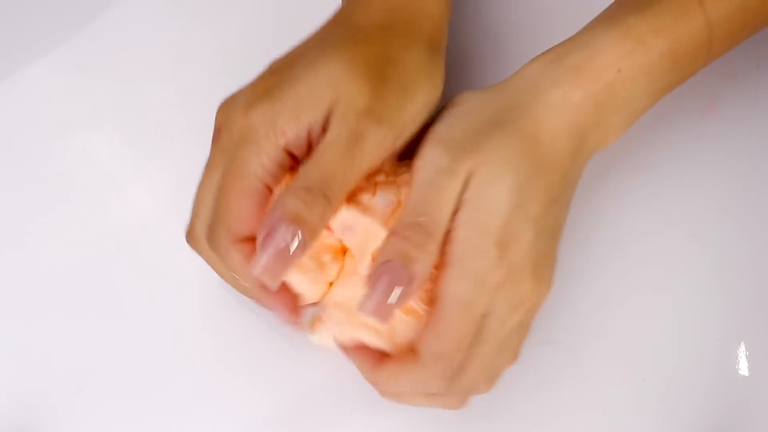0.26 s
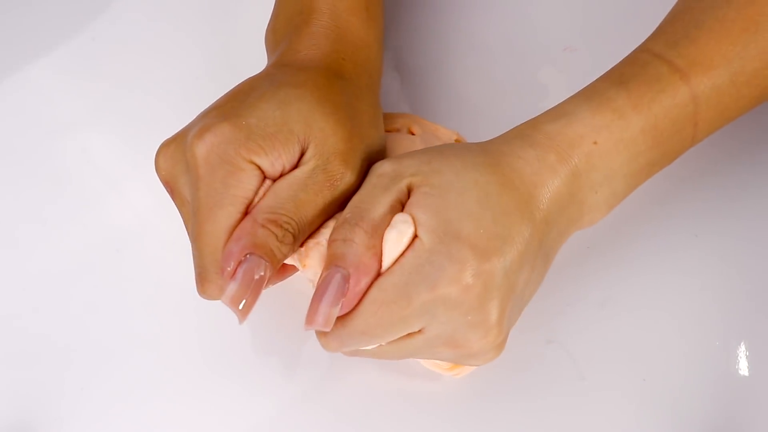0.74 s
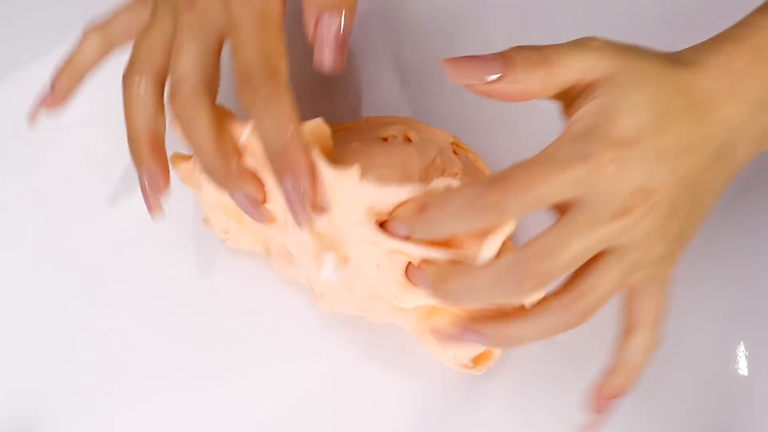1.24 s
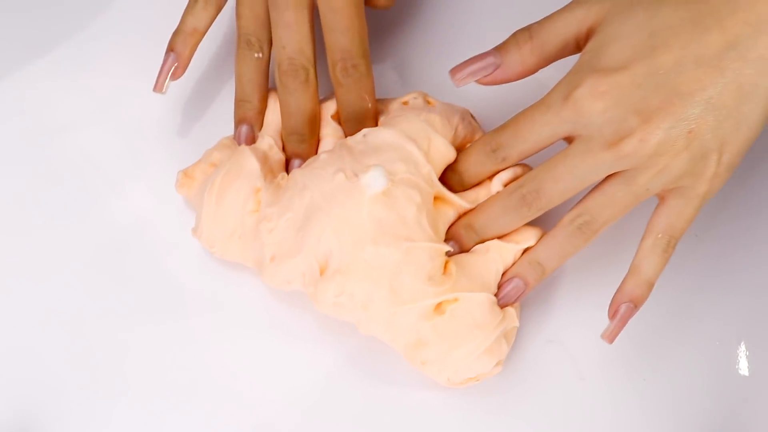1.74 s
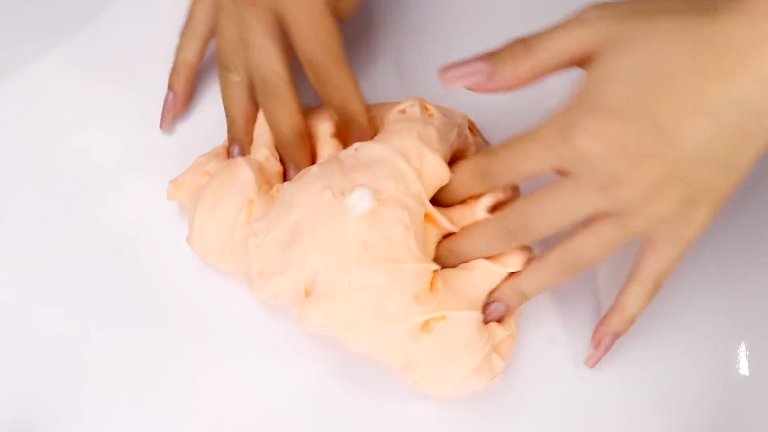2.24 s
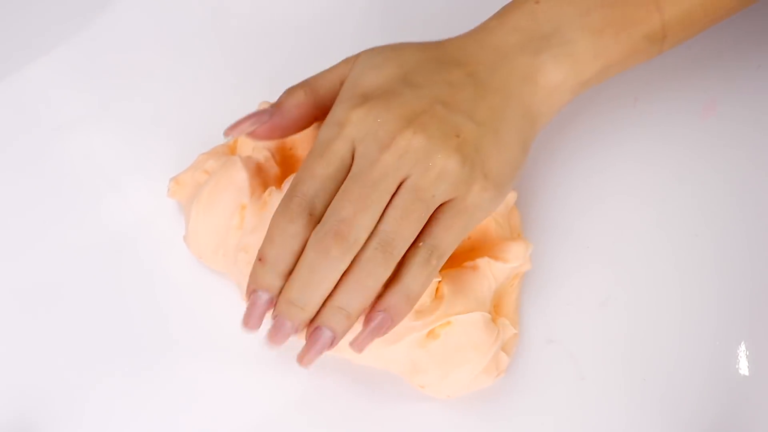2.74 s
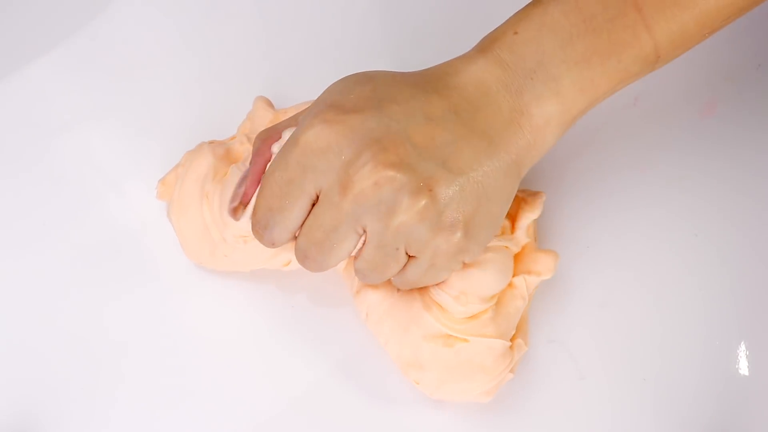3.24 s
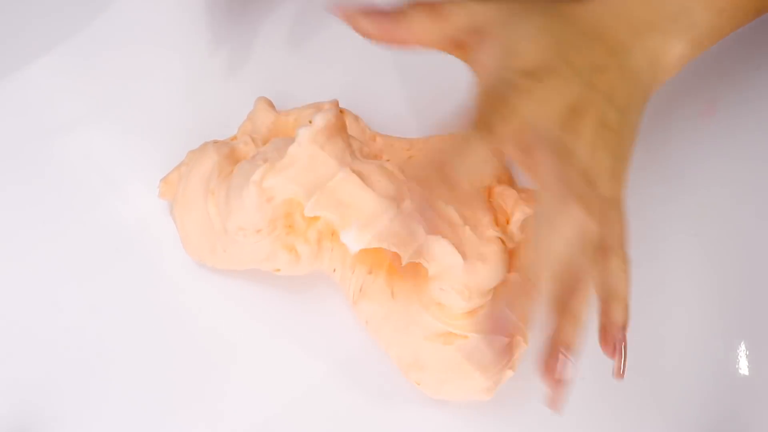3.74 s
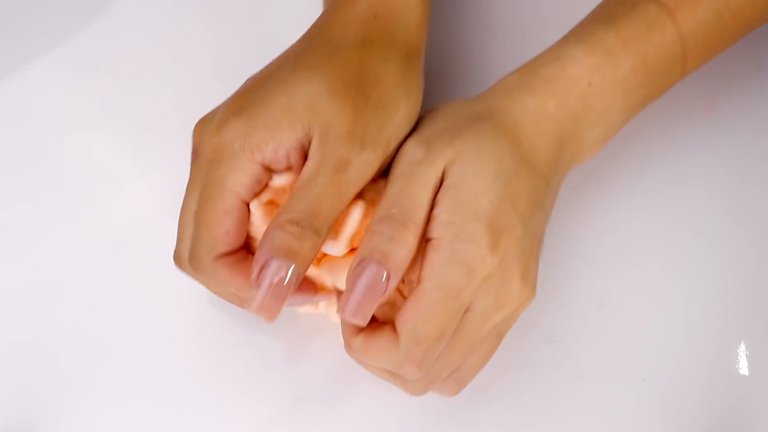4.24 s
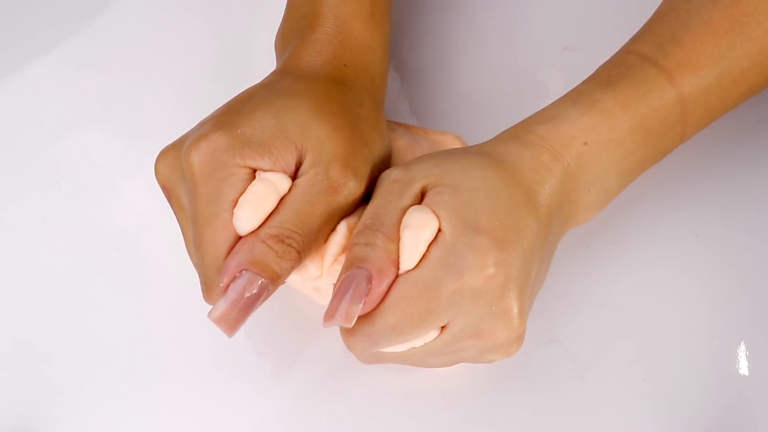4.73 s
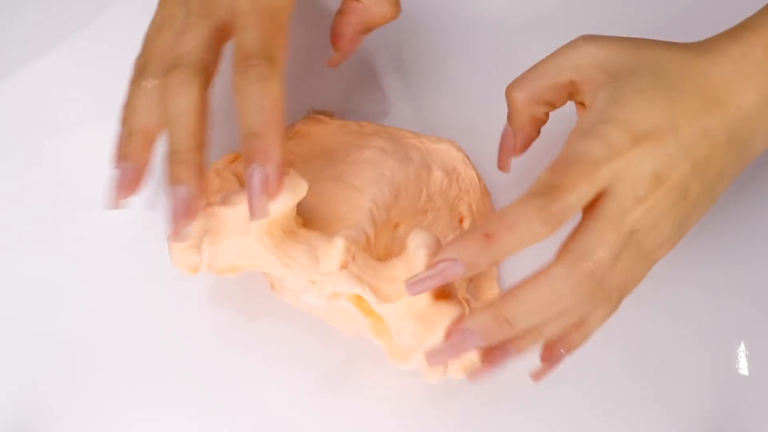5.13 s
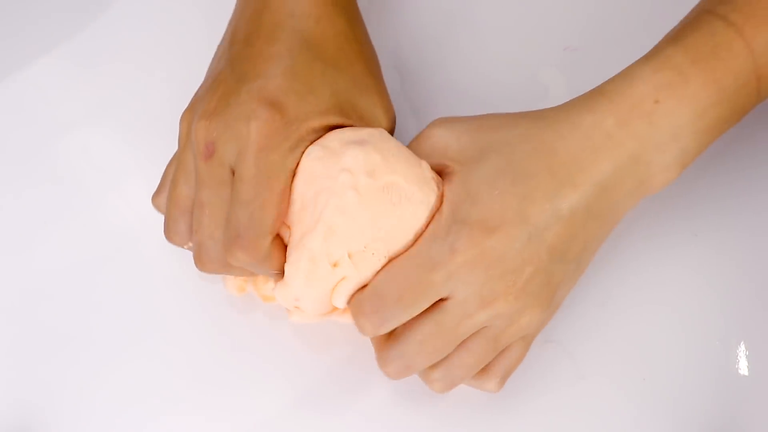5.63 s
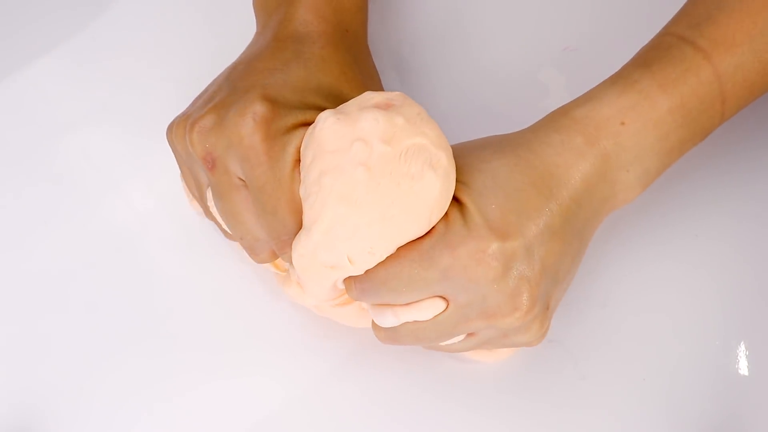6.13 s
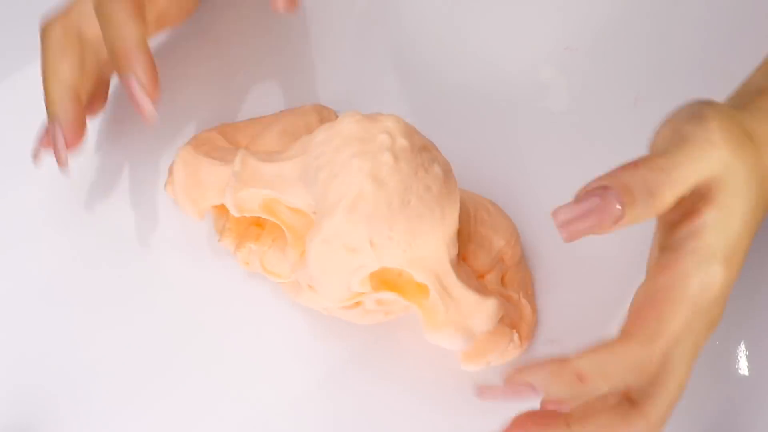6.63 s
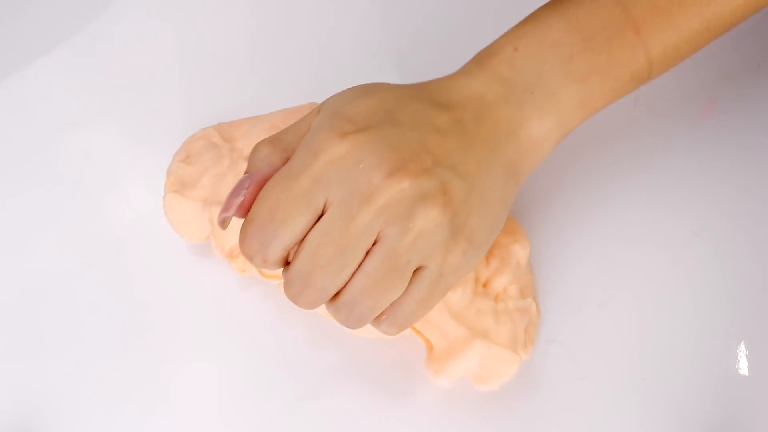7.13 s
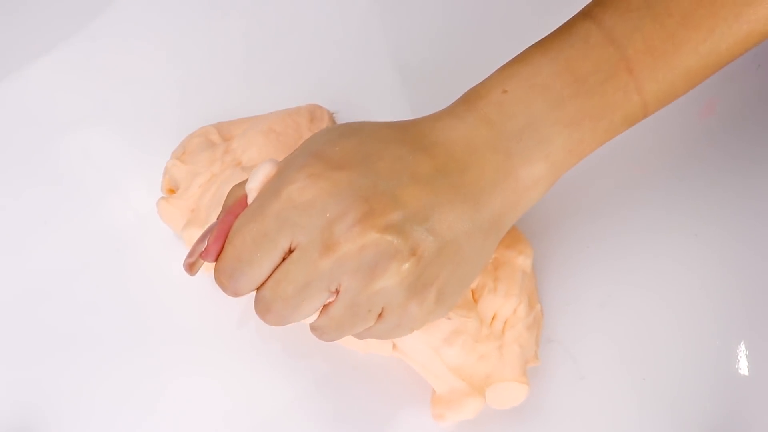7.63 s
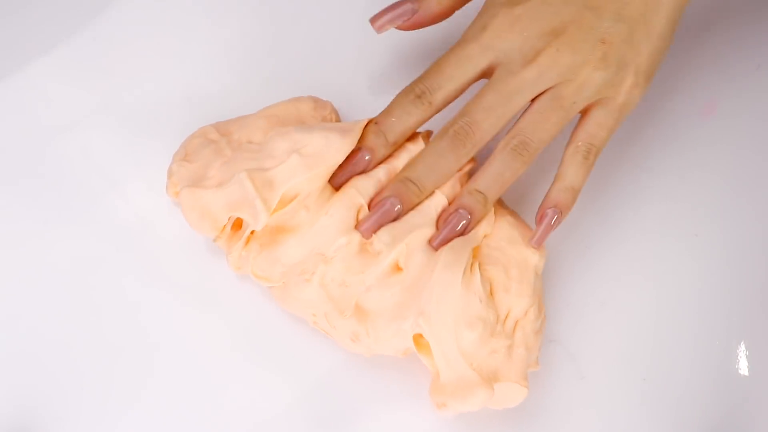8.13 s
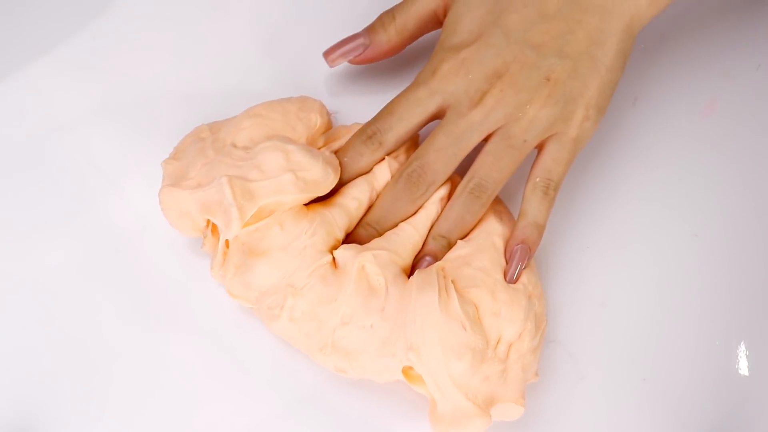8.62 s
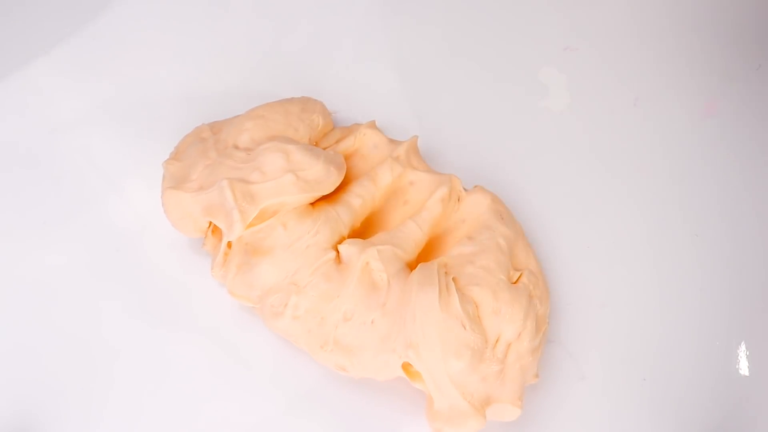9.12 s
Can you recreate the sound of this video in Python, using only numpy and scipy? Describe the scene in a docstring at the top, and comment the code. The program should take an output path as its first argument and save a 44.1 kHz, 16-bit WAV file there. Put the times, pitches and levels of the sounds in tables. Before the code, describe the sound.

Two hands squeeze and knead sticky slime on a table, very close to the microphone. Scattered sharp clicks and fine crackle accompany soft squelches, with a loud snap early on and another strong pop around three seconds. Between squeezes, fingers peel off in short dense wet smacks, with low gulps. The small room is quiet, with faint low rumble and hiss and a very short echo.

```python
"""In a small quiet room, two hands knead soft, sticky slime on a table, close to the microphone.
Squeezing bursts trapped air bubbles: random tiny clicks make fine crackle and squelch, and single
pressure pulses with a short spit of noise make pops, clicks and one loud snap. Between squeezes the
fingers peel away with a dense wet smack, and hollows gulp as short tones of rising pitch.
Room tone, table and room echo are filtered noise, ringing modes and dying noise tails."""
import sys
import numpy as np
from scipy import signal
from scipy.fft import rfft, irfft, next_fast_len
from scipy.io import wavfile
from scipy.ndimage import uniform_filter1d

SR = 44100
rng = np.random.default_rng(int(sys.argv[2]) if len(sys.argv) > 2 else 0)


def write(x):
    x = np.atleast_2d(x).T
    wavfile.write(sys.argv[1], SR, np.round(np.clip(x, -1, 1) * 32767).astype(np.int16))


N = 413215
TIME = np.arange(N) / SR   # [s]


def from_db(db):
    """Turn decibels into a gain."""
    return 10 ** (np.asarray(db) / 20)


def rms_one(x):
    """Scale a sound to unit power."""
    return x / np.sqrt(np.mean(x ** 2) + 1e-20)


def at_hz(points, hz, axis=1):
    """Read one column of a table at any pitch, on a log-frequency axis."""
    points = np.array(points)
    return np.interp(np.log(np.maximum(hz, 1)), np.log(points[:, 0]), points[:, axis])


def band(x, hz, octaves):
    """Keep only the pitches around a centre; the filter never looks ahead in time."""
    top = min(hz * 2 ** (octaves / 2), .44 * SR)
    bottom = min(hz / 2 ** (octaves / 2), top * .9)
    band_pass = signal.butter(2, [bottom, top], "band", fs=SR, output="sos")
    return signal.sosfilt(band_pass, x + 1e-18)


def add(out, s, sound):
    """Mix a short sound in at time s."""
    at = int(round(s * SR))
    out[at:at + len(sound)] += sound[:N - at]


def drift(rate):
    """Wander by chance in straight lines between random points, rate points a second; unit power."""
    knots = rng.standard_normal(int(N / SR * rate) + 2)
    return rms_one(np.interp(TIME * rate, np.arange(len(knots)), knots))


# colour of the room tone; only the shape counts: (frequency [Hz], relative level [dB per Hz])
ROOM_TONE_COLOUR = [(12, -6), (25, -11.5), (45, -11.5), (68, -21), (100, -24), (200, -28.5), (330, -36),
                    (750, -36.5), (1500, -35), (2300, -35), (3100, -38), (5500, -48), (10000, -49),
                    (16000, -56)]
ROOM_TONE_DB = -59.5   # overall level


def room_tone():
    """Steady low rumble and faint hiss: random noise, coloured by the table."""
    size = next_fast_len(N)
    hz = np.arange(size // 2 + 1) * SR / size
    colour = from_db(at_hz(ROOM_TONE_COLOUR, hz))
    noise = irfft(rfft(rng.standard_normal(size)) * colour, size)[:N]
    return from_db(ROOM_TONE_DB) * rms_one(noise)


# thin films at the surface break with a broad click; pops() trims both levels:
# (time [s], pulse peak level [dB], pulse centre [Hz], air spit level [dB])
SURFACE_CLICKS = [(0.1359, -13.5, 4020, -34.5), (0.151, -10, 2630, -48.5), (0.2379, -13, 2630, -36),
                  (0.2681, -8, 2520, -49), (0.3038, -14, 3210, -52), (0.4067, -18.5, 1310, -51),
                  (0.4764, -31, 2890, -40), (0.546, -41, 4000, -45.5), (0.6605, -12, 1820, -31),
                  (0.7018, -8.5, 1370, -23.5), (0.7538, -19.5, 1940, -42), (1.095, -10, 860, -62),
                  (1.244, -30, 2350, -34.5), (1.402, -24, 1880, -62), (1.5487, -24, 2080, -48),
                  (1.5651, -22, 2630, -54), (1.7295, -33, 3660, -50), (2.274, -21, 2343, -36),
                  (2.2975, -14, 1290, -53), (2.343, -5, 2820, -45), (2.9316, -26, 1900, -42),
                  (2.983, -21.5, 2120, -34), (3.552, -14, 605, -34.5), (3.585, -14.5, 567, -45),
                  (3.9002, -24, 1556, -50), (3.9214, -12, 7300, -47), (4.367, -12.5, 7000, -53),
                  (4.441, -21, 10100, -45), (4.4993, -23.5, 3520, -40), (4.5392, -17.5, 7600, -57),
                  (4.643, -44, 4850, -45.5), (4.8836, -15.5, 1160, -36), (4.9088, -12.5, 1140, -35),
                  (4.9447, -13, 2100, -34.5), (5.303, -19, 1130, -45.5), (5.4059, -25.5, 2610, -50),
                  (5.4447, -18, 9000, -53), (5.4648, -16, 1390, -48.5), (5.6364, -12, 3160, -32.5),
                  (5.693, -16.5, 1700, -36), (5.8263, -25, 1920, -45), (6.089, -28, 3900, -57),
                  (6.3443, -5.5, 1540, -44), (6.53, -10, 2890, -41.5), (7.1436, -13, 1950, -35.5),
                  (7.336, -41, 7000, -57.5), (7.472, -36, 6900, -55), (7.781, -12, 503, -34.5),
                  (8.1287, -22.5, 5000, -43.5), (8.2502, -27, 2930, -46), (8.2973, -16.5, 1440, -59),
                  (8.944, -7.5, 1700, -27), (8.988, -13.5, 2000, -45)]
CLICK_OCTAVES, CLICK_SPIT_HZ, CLICK_SPIT_S = 3.51, 8060, 0.0014   # pulse width; spit centre and rise time
# deep air pockets burst with a round pop; pops() trims both levels:
# (time [s], pulse peak level [dB], pulse centre [Hz], pulse width [octaves],
#  air spit level [dB], air spit centre [Hz], air spit rise time [s])
DEEP_POPS = [(0.8658, -7.5, 7200, 1.1, -13.5, 7100, 0.0012), (0.8666, -0.5, 744, 2.6, -15.5, 11000, 0.0023),
             (2.7444, -12, 1710, 1.03, -39, 9500, 0.00097), (3.082, 0, 1680, 4.1, -19, 6400, 0.00065),
             (3.2093, -4.5, 1070, 1.34, -12.5, 8800, 0.00022),
             (4.7354, -13, 940, 1.2, -44.5, 4760, 0.00053), (5.86, -4.5, 1060, 2.4, -18.5, 9300, 0.0009)]


def peaked_pulse(hz, octaves, size):
    """One sudden push of pressure around a centre pitch, with a peak of one."""
    pulse = band(signal.unit_impulse(size), hz, octaves)
    return pulse / np.abs(pulse).max()


def pops(spit_octaves=0.57, rasp_db=-3.0, rasp_hz=3500, rasp_octaves=9.5, pulse_db=-4.5, air_db=0.5,
         neighbour_db=-16.5, neighbour_s=0.0058, neighbour_octaves=1.8, scatter_octaves=1.43, count=5, size=2048):
    """A bubble's wall gives way in one pressure pulse, then air spits through the tear; gives pulses and spits."""
    bubbles = list(DEEP_POPS)
    for s, peak_db, hz, spit_db in SURFACE_CLICKS:
        bubbles.append((s, peak_db, hz, CLICK_OCTAVES, spit_db, CLICK_SPIT_HZ, CLICK_SPIT_S))
    pulses, spits, t = np.zeros(N), np.zeros(N), TIME[:size]
    for s, peak_db, hz, octaves, spit_db, spit_hz, spit_s in bubbles:
        add(pulses, s, from_db(peak_db + pulse_db) * peaked_pulse(hz, octaves, size))

        # neighbours of other sizes give way around it, the farther in time the weaker
        offsets = rng.uniform(-.6, 2.2, count)
        ratios = 2 ** (scatter_octaves * rng.uniform(-1.45, 1, count))
        for offset, ratio in zip(offsets, ratios):
            small = peaked_pulse(hz * ratio, neighbour_octaves, size)
            gain = from_db(peak_db + neighbour_db) * np.exp(-abs(offset))
            add(pulses, s + offset * neighbour_s, gain * small)

        air = rng.standard_normal(size)
        outflow = t / spit_s * np.exp(1 - t / spit_s)   # strongest after spit_s
        hiss = rms_one(band(air, spit_hz, spit_octaves))
        rasp = rms_one(band(air[::-1], rasp_hz, rasp_octaves))
        add(spits, s, from_db(spit_db + air_db) * outflow * (hiss + from_db(rasp_db) * rasp))
    return pulses, spits


# lowest modes of the table top under the slime: (frequency [Hz], gain [dB], time to fall by 60 dB [s])
TABLE_MODES = [(40, 7, 0.18), (100, 3, .16), (226.4, 1, 0.24), (298, -2.5, 0.21)]


def table_top(force):
    """The table top booms briefly in its lowest modes when pushed."""
    out = 0
    for hz, level_db, t60 in TABLE_MODES:
        r = from_db(-60 / (t60 * SR))   # what is left after each sample
        push = (1 - r * r) / 2 * np.array([1, 0, -1])
        ring = [1, -2 * r * np.cos(2 * np.pi * hz / SR), r * r]
        out = out + from_db(level_db) * signal.lfilter(push, ring, force)
    return out


def even_tail(decay, smooth_hz=45, count=3):
    """Dying noise whose spectrum is evened out, so that no single pitch rings on."""
    tail = rng.standard_normal(len(decay))
    width = max(int(smooth_hz * len(decay) / SR), 2)
    for _ in range(count):
        spectrum = rfft(tail * decay)
        power = uniform_filter1d(np.abs(spectrum) ** 2, width)
        tail = irfft(spectrum / np.sqrt(power), len(decay))
        loudness = np.sqrt(np.abs(uniform_filter1d(tail ** 2, size=300)) + 1e-20)
        tail = rms_one(tail / loudness)
    return tail * decay / np.linalg.norm(decay)


# room echo: (frequency [Hz], tail level before band filtering [dB], time to fall by 60 dB [s])
ROOM_ECHO = [(80, -15, 0.27), (250, -8.5, 0.12), (502.3, -13.5, 0.33), (1200, -10.5, 0.21),
             (2967, -7, 0.14), (7100, -11, 0.29), (15780, -14.5, 0.12)]


def room(x, near_db=-9.0, near_s=0.0039, build_s=0.0084, size=20000):
    """Quick reflections from hands and table, then a faint tail that dies band by band."""
    t, echo = TIME[:size], 0
    for hz in np.geomspace(80, 14500, 16):
        build_up = 1 - np.exp(-t / build_s)
        decay = from_db(-60 * t / at_hz(ROOM_ECHO, hz, axis=2)) * build_up
        echo = echo + from_db(at_hz(ROOM_ECHO, hz)) * band(even_tail(decay), hz, 0.6)
    near = rng.standard_normal(size) * np.exp(-t / near_s) * (t > .0005)
    near = from_db(near_db) * near / np.linalg.norm(near)
    return signal.fftconvolve(x, echo + near)[:N]


def ruptures(per_s, spread_db, clump_db, top_db):
    """Tiny films break at random, in clumps; most are small, a few large."""
    chance = per_s * from_db(clump_db * drift(70)) / SR
    born = rng.random(N) < chance
    size_db = np.minimum(spread_db * rng.exponential(1, N), top_db)
    return born * from_db(size_db) * rng.choice([-1, 1], N)


def ragged(clicks, spit_db, spit_s):
    """Each click trails off into a brief spit of escaping air."""
    keep = np.exp(-2 / (spit_s * SR))
    outflow = np.sqrt(signal.lfilter([1 - keep], [1, -keep], clicks ** 2 + 1e-18))
    return clicks + from_db(spit_db) * outflow * rng.standard_normal(N)


def grains(clicks, spectrum, vary_db, count, wander_db=2.5, spit_db=-21.0, spit_s=0.00098):
    """Each rupture rings a few broad resonances, which come and go as the folds change shape; unit power."""
    edges = np.geomspace(spectrum[0][0], spectrum[-1][0], count + 1)
    out = 0
    for k, (low, high) in enumerate(zip(edges, edges[1:])):
        hz = np.sqrt(low * high)
        strength = from_db(vary_db * rng.uniform(-1.9, 1, N) + wander_db * drift(55))
        own = ragged(clicks * strength, spit_db, spit_s)
        sign = (-1) ** k   # neighbouring bands alternate in sign
        out = out + sign * from_db(at_hz(spectrum, hz)) * band(own, hz, np.log2(high / low))
    return rms_one(out)


EDGE_DB = 20   # change of level within one attack or release time


def stroke(s, attack_s, hold_s, release_s, sag_db=0):
    """Gain of one hand movement: it builds up to time s, holds while sagging, and dies away."""
    early = np.maximum(s - TIME, 0) / attack_s
    late = np.maximum(TIME - s - hold_s, 0) / release_s
    sag = sag_db * np.clip((TIME - s) / hold_s, 0, 1)
    return from_db(-EDGE_DB * np.minimum(early + late, 10) - sag)


# colour of squelch and crackle; only the shape counts: (frequency [Hz], relative level [dB per Hz])
SQUELCH_COLOUR = [(150, -7), (230, -3), (450, 0), (900, -5), (1600, -8.5), (3200, -12)]
CRACKLE_COLOUR = [(3000, 4.5), (4500, -0.5), (7000, 0.5), (10000, 4.5), (13000, -0.5), (16000, -0.5)]
# fingers press into the slime; squeezing() trims both levels:
# (time [s], attack [s], hold [s], release [s], squelch level [dB], crackle level [dB])
FINGER_SQUEEZES = [(0.258, 0.066, 0.067, 0.075, -46.5, -53.5), (0.42, 0.08, 0.6, 0.074, -60, -59.5),
                   (1.387, 0.057, 0.15, 0.55, -62, -67.5), (2.812, 0.099, 0.24, 0.12, -56.5, -64),
                   (3.062, 0.075, 0.14, 0.2, -54, -58), (3.974, 0.14, 0.12, 0.13, -63, -61.5),
                   (4.302, 0.084, .27, 0.24, -59, -55.5), (5.519, 0.29, 0.06, .12, -54, -59.5),
                   (5.673, .1, 0.31, 0.2, -60, -60.5), (7.066, 0.084, 0.12, 0.29, -58.5, -59),
                   (8.136, 0.18, 0.17, 0.18, -60.5, -62.5)]


def squeezing(squelch_db=0.0, crackle_db=5.5, fizz_db=-6.5):
    """Pinhead bubbles tick at the surface over a fine fizz; buried ones squelch."""
    ticks = ruptures(per_s=170, spread_db=8.5, clump_db=6.0, top_db=17.0)
    fizz = ruptures(per_s=3500, spread_db=5.0, clump_db=7.0, top_db=15.5)
    bursts = rms_one(ticks) + from_db(fizz_db) * rms_one(fizz)
    deep, surface = np.zeros(N), np.zeros(N)
    for s, attack_s, hold_s, release_s, deep_db, surface_db in FINGER_SQUEEZES:
        press = stroke(s, attack_s, hold_s, release_s)
        deep += from_db(deep_db) * press
        surface += from_db(surface_db) * press
    squelch = grains(bursts, SQUELCH_COLOUR, vary_db=11.5, count=7)
    crackle = grains(bursts, CRACKLE_COLOUR, vary_db=9.5, count=5, spit_db=-2.5)
    return from_db(squelch_db) * deep * squelch + from_db(crackle_db) * surface * crackle


# hollows that open and ring: (time [s], peak level of the swell [dB], starting pitch [Hz])
HOLLOW_GULPS = [(.702, -28, 404), (.867, -10, 493), (2.116, -50, 450), (2.296, -17, 453), (2.325, -24, 326),
                (2.342, -25, 320), (2.362, -21, 393), (2.369, -29.5, 222), (3.0816, -30.5, 275),
                (3.582, -28, 447), (3.619, -28, 238), (4.499, -40.5, 880), (4.885, -30.5, 461),
                (5.301, -44.5, 308), (5.522, -38, 219), (5.526, -38, 800), (5.859, -33, 292),
                (6.499, -24.5, 368), (6.597, -29.5, 874), (6.961, -45.5, 413), (7.061, -47.5, 408.4),
                (7.783, -26, 308), (8.224, -47.5, 230), (8.225, -39.5, 1020), (8.296, -47, 290),
                (8.941, -26, 710), (8.95, -25, 266), (8.982, -22, 322), (8.992, -22.5, 283)]


def gulps(cycles=0.72, rise=0.0078, size=4096):
    """A soft-walled hollow swells and dies within a few cycles, its pitch rising as it opens."""
    out = np.zeros(N)
    for s, peak_db, hz in HOLLOW_GULPS:
        turns = hz * TIME[:size]
        swell = turns / cycles * np.exp(1 - turns / cycles)
        tone = np.sin(2 * np.pi * turns * (1 + rise * turns))
        add(out, s, from_db(peak_db) * swell * tone)
    return out


# colour of suck, smack and sizzle; only the shape counts: (frequency [Hz], relative level [dB per Hz])
SUCK_COLOUR = [(70, -6), (100, -10), (140, -11), (220, -5), (340, -6), (600, -1)]
SMACK_COLOUR = [(600, -2.5), (850, 2.5), (1100, -4.5), (1600, -2), (2400, -9), (3500, -4)]
SIZZLE_COLOUR = [(3500, 13), (5000, -1), (8000, 5.5), (12000, 4), (16000, -11)]
PULL_RELEASE_S = 0.018   # the last threads let go
# skin peels off the slime; peeling() trims the three levels:
# (time [s], attack [s], hold [s], sag over the hold [dB],
#  suck level [dB], smack level [dB], sizzle level [dB])
SKIN_PULLS = [(1.1, 0.033, .23, 15, -43, -39, -43), (2.298, 0.034, 0.059, 1.5, -36.5, -36.5, -44),
              (3.596, 0.053, 0.08, -2, -40, -40, -43.5), (4.116, 0.068, 0.15, 1.5, -45, -47.5, -49.5),
              (4.9, 0.026, 0.15, 12.5, -36, -34.5, -38.5), (6.351, 0.037, 0.25, 3.5, -41, -39, -44.5),
              (7.79, 0.04, .15, 16, -40.5, -41.5, -40.5), (8.933, 0.03, .058, -1.5, -32.5, -43, -45)]


def peeling(suck_db=-1.0, smack_db=0.0, sizzle_db=1.5, tug_db=4.5):
    """Thousands of sticky threads let go of the skin; the larger pockets suck and tug at the table."""
    threads = ruptures(per_s=1700, spread_db=1.5, clump_db=4.5, top_db=19.5)
    pockets = ruptures(per_s=700, spread_db=1.5, clump_db=4.0, top_db=0)   # all of one size
    suction, smacking, sizzling = np.zeros(N), np.zeros(N), np.zeros(N)
    for s, attack_s, hold_s, sag_db, suction_db, smacking_db, sizzling_db in SKIN_PULLS:
        pull = stroke(s, attack_s, hold_s, PULL_RELEASE_S, sag_db)
        suction += from_db(suction_db) * pull
        smacking += from_db(smacking_db) * pull
        sizzling += from_db(sizzling_db) * pull
    suck = from_db(suck_db) * suction * grains(pockets, SUCK_COLOUR, vary_db=10.5, count=7)
    smack = from_db(smack_db) * smacking * grains(threads, SMACK_COLOUR, vary_db=6.5, count=7, wander_db=4.5)
    sizzle = from_db(sizzle_db) * sizzling * grains(threads, SIZZLE_COLOUR, vary_db=2.5, count=4, spit_db=4.0)
    tug = from_db(tug_db) * suction * rms_one(pockets)
    return suck + smack + sizzle + table_top(tug)


PULSE_ROOM_DB = -6.0   # share of the pulses that reaches table and room


def scene():
    """Slime, table, room and room tone in mono; the pulses fire up at the microphone and stay drier."""
    pulses, spits = pops()
    slime = spits + squeezing() + gulps() + peeling()
    spread = slime + from_db(PULSE_ROOM_DB) * pulses
    mono = slime + pulses + table_top(spread) + room(spread) + room_tone()
    return mono[None]


CUTOFF_HZ = 16100   # nearly nothing is left above this


def record(dry):
    """Round off the highest peaks, then cut the top of the treble steeply."""
    rounded = 1.2 * np.tanh(dry / 1.2)
    low_pass = signal.ellip(10, .2, 80, CUTOFF_HZ, fs=SR, output="sos")
    return signal.sosfilt(low_pass, rounded)


dry = scene()
out = record(dry)
write(out)
```